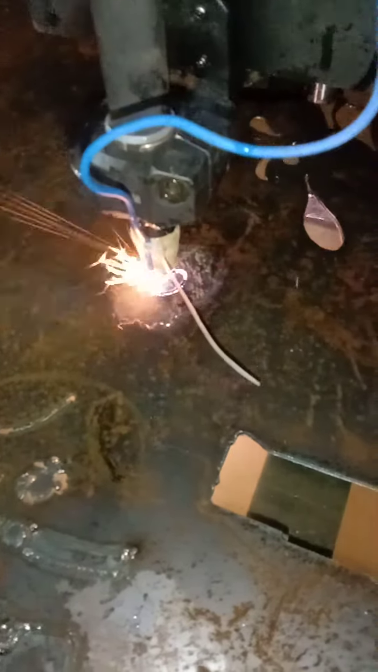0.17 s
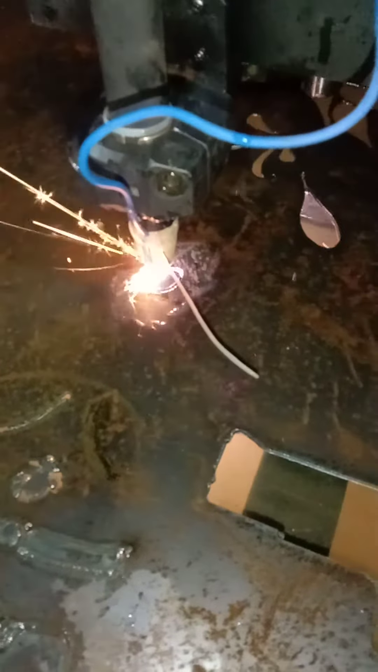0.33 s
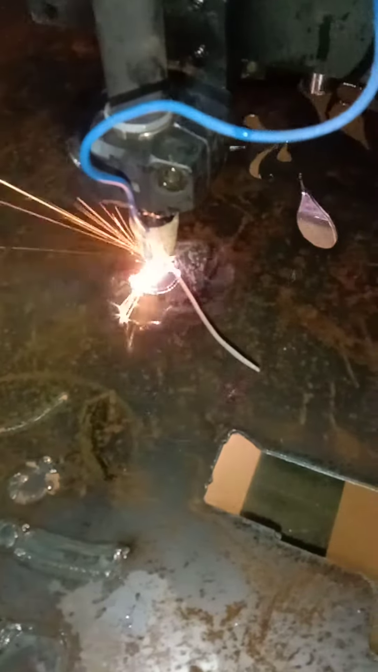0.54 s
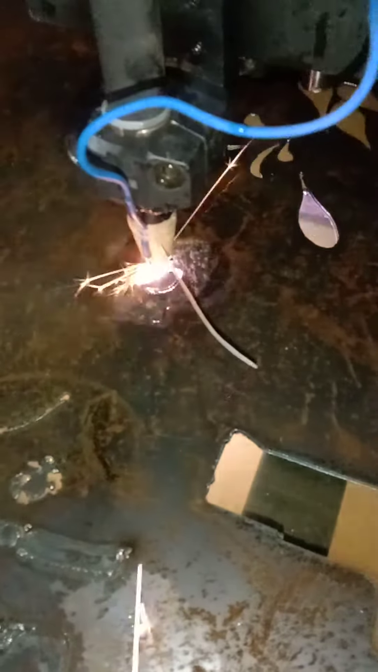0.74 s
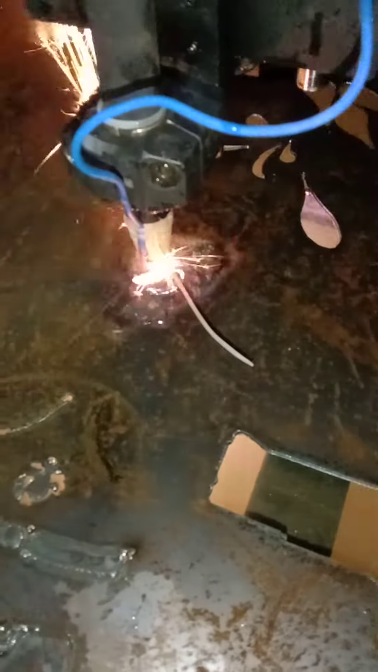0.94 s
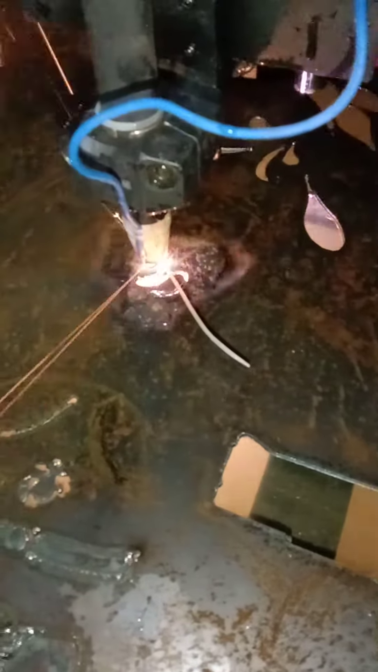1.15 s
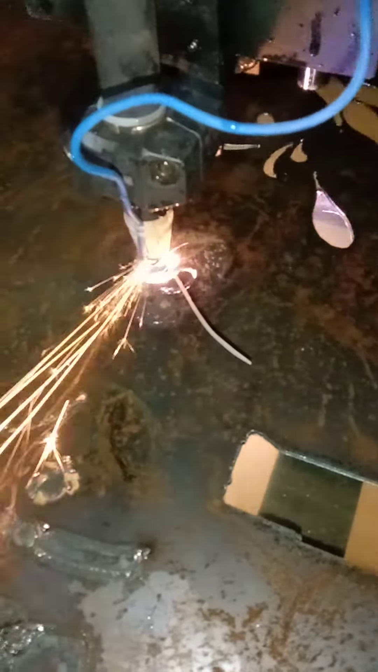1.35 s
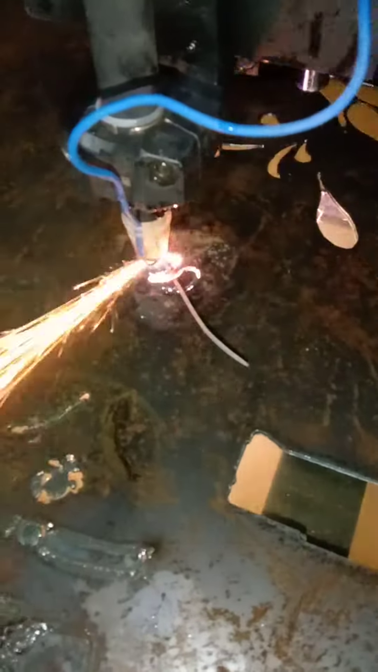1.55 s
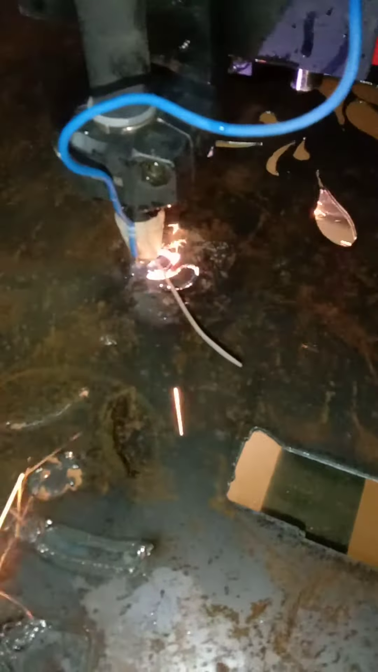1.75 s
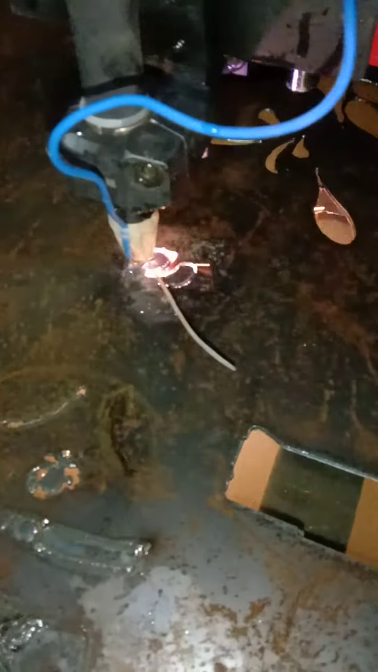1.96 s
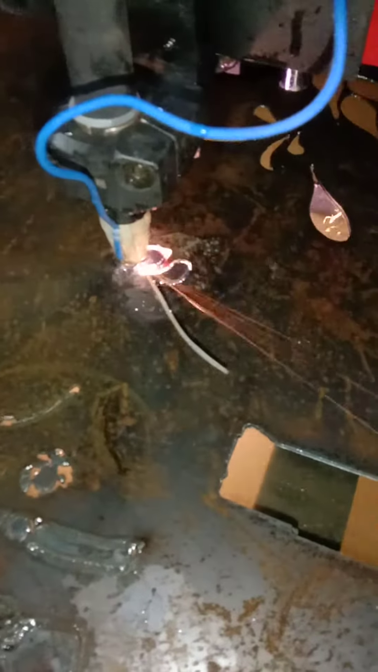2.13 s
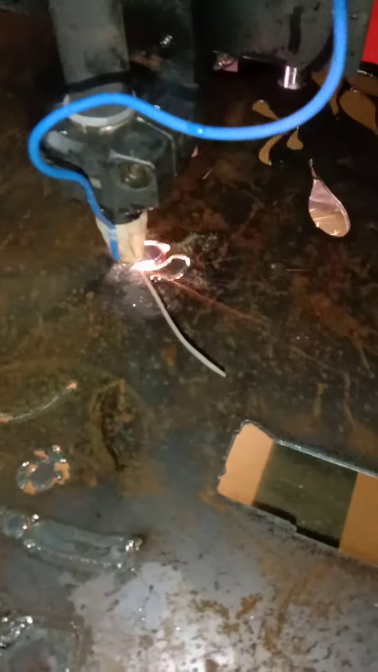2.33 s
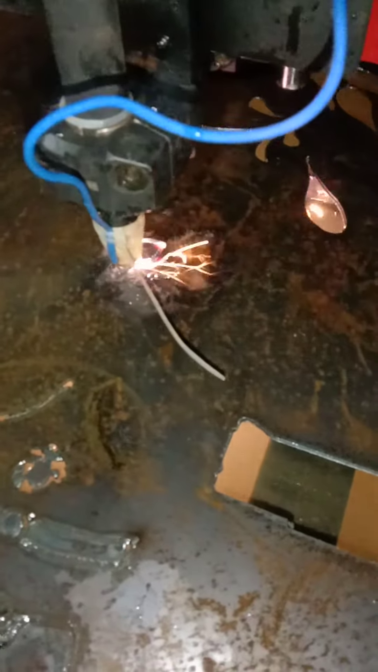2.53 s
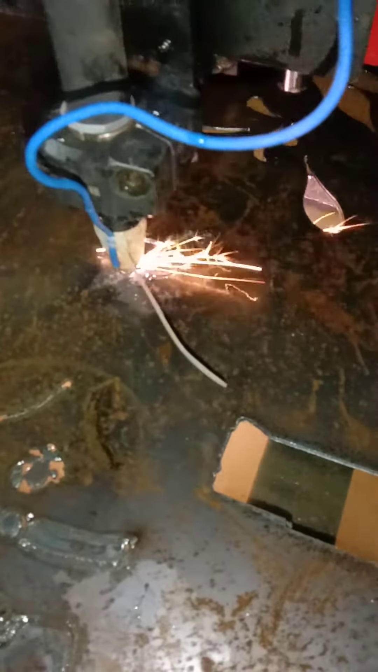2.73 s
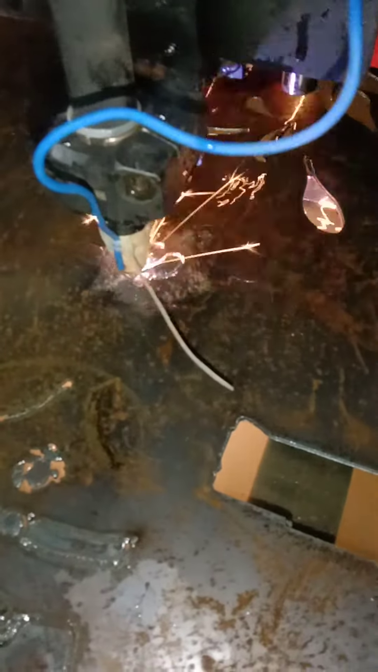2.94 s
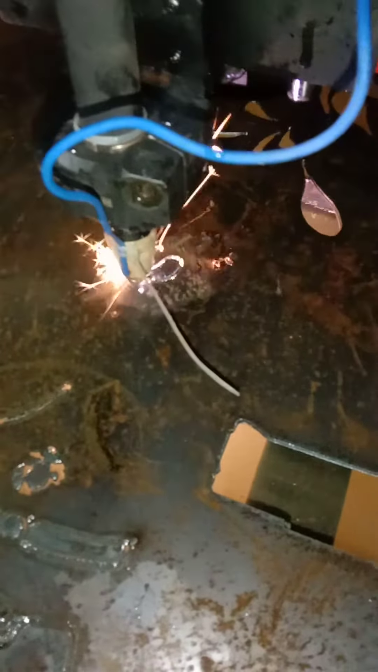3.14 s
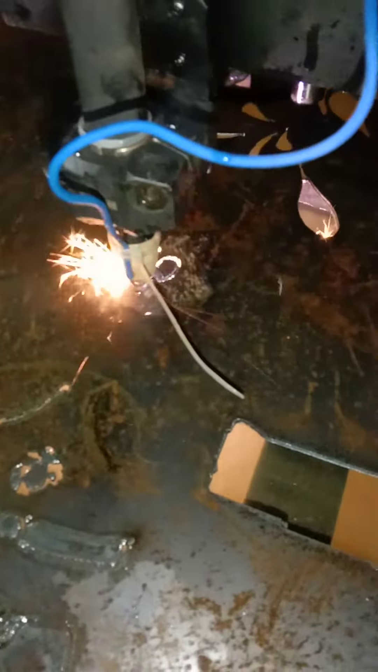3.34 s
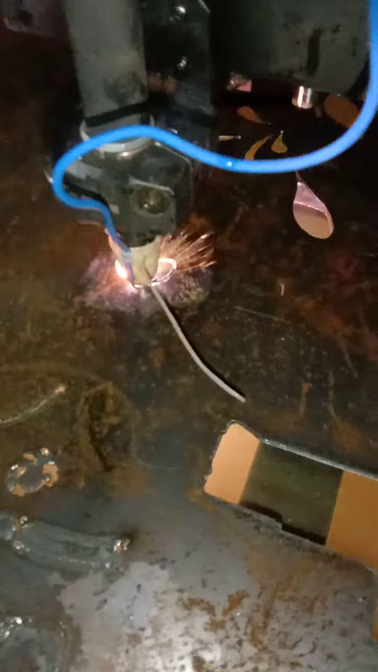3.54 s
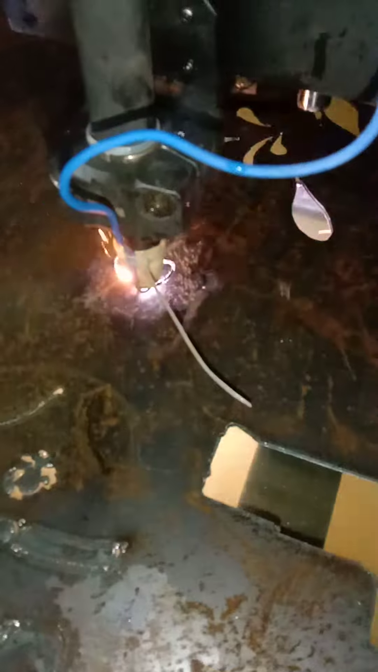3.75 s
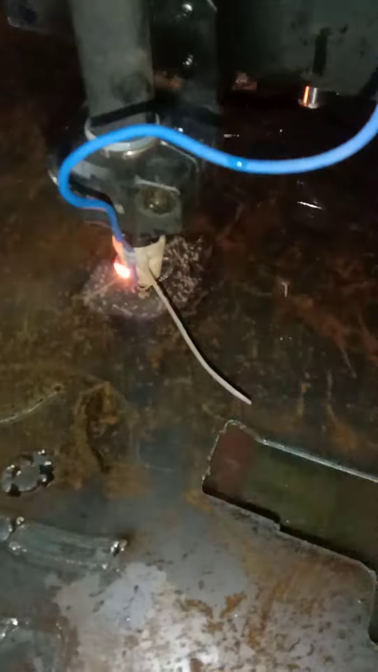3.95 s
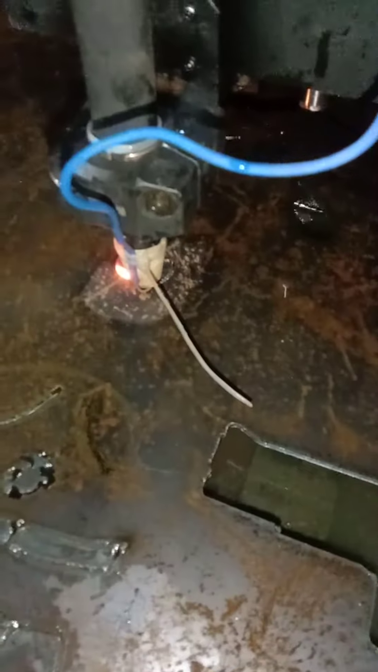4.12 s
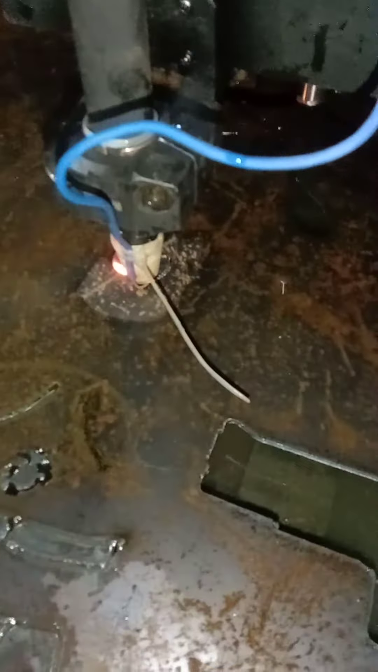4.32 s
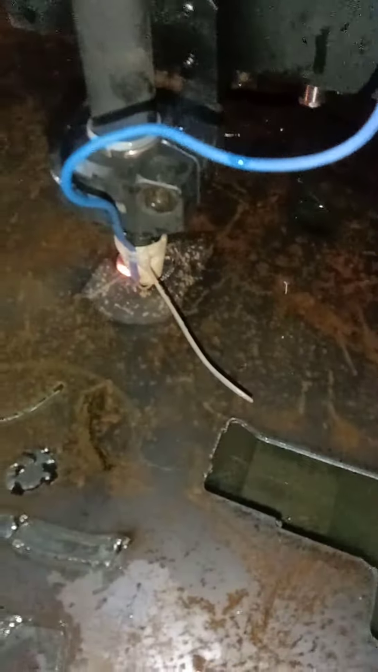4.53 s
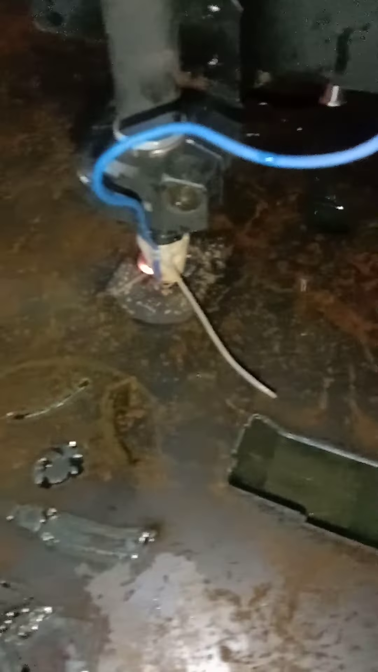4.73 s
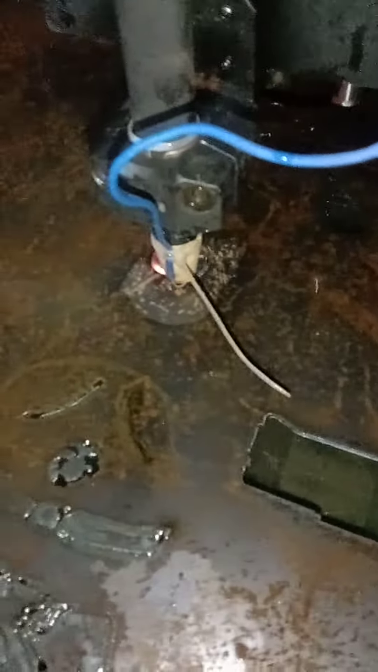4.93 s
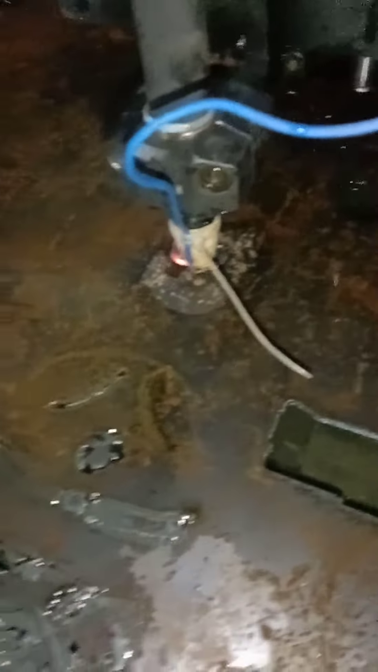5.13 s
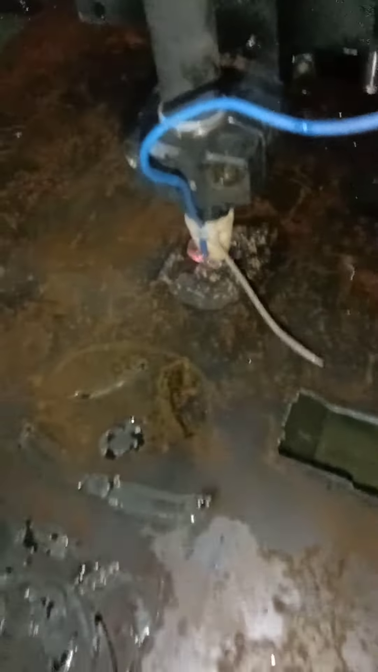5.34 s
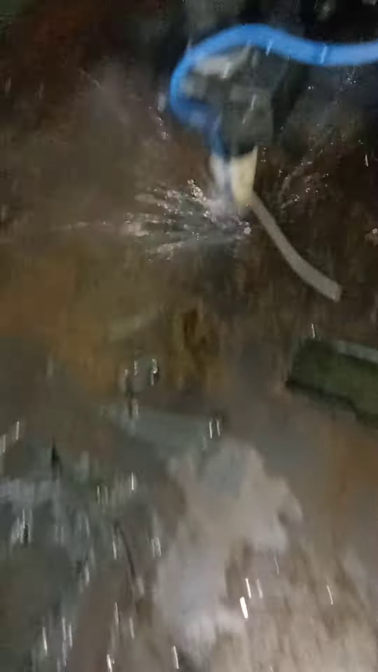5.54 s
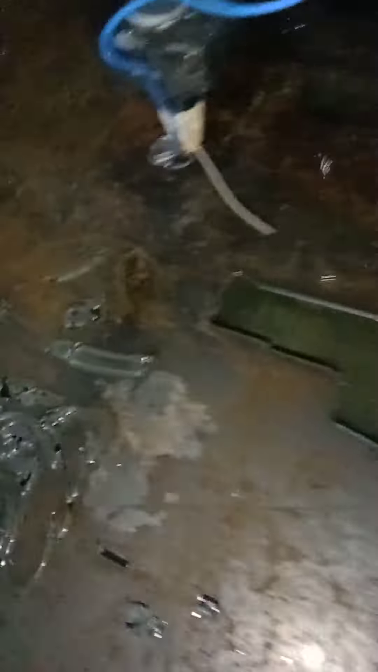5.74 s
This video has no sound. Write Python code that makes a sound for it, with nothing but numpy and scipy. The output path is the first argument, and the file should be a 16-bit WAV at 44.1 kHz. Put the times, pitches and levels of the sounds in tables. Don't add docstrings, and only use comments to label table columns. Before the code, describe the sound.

A plasma torch hisses and whistles fiercely on wet steel, cuts out to thin air hiss, then its jet sweeps loudly across the plate.

```python
import sys
import numpy as np
from scipy import signal
from scipy.fft import rfft, irfft, next_fast_len
from scipy.io import wavfile
from scipy.ndimage import uniform_filter1d, map_coordinates

SR = 44100
rng = np.random.default_rng(int(sys.argv[2]) if len(sys.argv) > 2 else 0)


def boost(x):
    u = np.asarray(x, float) / 20
    return 10 ** u


def store_wav(level_fs):
    pcm = np.round(np.clip(np.atleast_2d(level_fs), -1, 1) * 32767)
    wavfile.write(sys.argv[1], SR, pcm.T.astype(np.int16))


N = 254898
TIME_S = np.arange(N) / SR

# time in seconds, gas flow in dB,
# slot depth in dB by which the slot favours hiss over fizz.
ARC_FLOW = [(0, -23, -1.5), (.22, -22.5, -1), (.77, -21, 1), (.92, -25.5, 7), (1.03, -28, -3.5),
            (1.13, -23, -1.5), (1.29, -25.5, -1.5), (1.6, -25, 3), (1.9, -22.5, -10), (2.3, -24.5, -1.5),
            (2.65, -25, 0.5), (2.85, -24.5, -1), (3.15, -23.5, -0.5), (3.4, -23, 1), (3.63, -22.5, -0.5),
            (3.83, -25.5, -1), (3.89, -21, -1.5), (4.012, -22.5, -4)]
ARC_END_S = ARC_FLOW[-1][0]
# time in seconds, hiss in dB,
# nozzle height in dB by which fizz fades against hiss.
JET_SWEEP = [
    (5.085, -31.5, -2),
    (5.17, -26.5, -3),
    (5.3, -22.5, -2.5),
    (5.46, -20, 0),
    (5.515, -23, 5),
    (5.555, -16, 7),
    (5.595, -24, 8),
    (5.63, -20.5, 5),
    (5.78, -23, 4),
]


def unit(x):
    return x / np.sqrt(np.mean(x ** 2) + 1e-20)


def along(points, hz):
    f, v = np.transpose(points)
    return np.interp(np.log(hz + 1), np.log(f + 1), v, left=-120)


def gate(start_s, end_s):
    ramp_s = .018
    rising = np.clip((TIME_S - start_s) / ramp_s + 1, 0, 1)
    falling = np.clip((end_s - TIME_S) / ramp_s + 1, 0, 1)
    return rising * falling


def curves(rows):
    s, *cols = np.transpose(rows)
    return [gate(s[0], s[-1])] + [np.interp(TIME_S, s, c) for c in cols]


def bumps(rows):
    return sum(boost(db) * np.exp(-((TIME_S - s) / half_s) ** 2) for s, half_s, db in rows)


def swells(notes, idle_db):
    power = boost(2 * idle_db)
    for s, half_s, db, hz in notes:
        power = power + boost(2 * db) * np.exp(-2 * ((TIME_S - s) / half_s) ** 2)
    peak_s, note_hz = np.transpose(notes)[[0, 3]]
    return np.sqrt(power), np.interp(TIME_S, peak_s, note_hz)


def decay(start_s, fade_s):
    return np.exp(-np.clip(TIME_S - start_s, 0, None) / fade_s)


def wobble(rate):
    knots = rng.standard_normal(int(N * rate / SR) + 4)
    return map_coordinates(knots, [np.arange(N) * rate / SR])


def filtered(x, response):
    m = next_fast_len(N + SR // 2)
    return irfft(rfft(x, m) * response(np.fft.rfftfreq(m, 1 / SR)), m)[..., :N]


def turbulence(streak_db, patch_db):
    hz, t, z = signal.stft(rng.standard_normal(N), SR, nperseg=512)

    def blur(rows, cols):
        grain = uniform_filter1d(rng.standard_normal(z.shape), rows, 0)
        return unit(uniform_filter1d(grain, cols, 1))

    weaker_low_down = np.clip(hz / 4000, .3, 1)[:, None]
    streaks = streak_db * weaker_low_down * blur(2, 40)
    patches = patch_db * blur(20, 6)
    return signal.istft(z * boost(streaks + patches), nperseg=512)[1][:N]


def bands(x, colour, edges_hz):
    def above(hz, edge):
        return 1 / (1 + (edge / (hz + 1)) ** 24)

    def part(lo, hi):
        split = lambda hz: np.sqrt(np.abs(above(hz, lo) - above(hz, hi)))
        return unit(filtered(x, lambda hz: boost(along(colour, hz)) * split(hz)))

    return [part(lo, hi) for lo, hi in zip(edges_hz, edges_hz[1:])]


def narrow(hz, width_hz):
    slow = rng.standard_normal((2, N))
    for stage in (1, 2, 2):
        slow = signal.lfilter([1], [1, -np.exp(-stage * np.pi * width_hz / SR)], slow)
    turn = 2 * np.pi * np.cumsum(hz * np.ones(N)) / SR
    return unit(slow[0] * np.cos(turn) + slow[1] * np.sin(turn))


def arc():
    # frequency in Hz, level in dB per Hz.
    arc_colour = [(300, -27), (500, -11), (690, -1), (800, -12.5), (1050, -8), (1350, -10), (2040, -9),
                  (2900, -10), (4200, -12), (5000, 0.5), (7100, 2), (9200, -8.5), (11300, -7), (15400, 0)]
    # centre in Hz, width in Hz, gain in dB.
    plate_modes = [(1202, 20, 8), (1315, 140, 10.5), (1526, 22, 11.5), (1700, 36, 5)]
    on, flow_db, depth_db = curves(ARC_FLOW)
    plate = lambda hz: boost(sum(db / (1 + (2 * (hz - c) / w) ** 2) for c, w, db in plate_modes))
    gas = filtered(turbulence(streak_db=2.2, patch_db=1.3), plate)
    roar, body, hiss, edge, fizz = bands(gas, arc_colour, [1, 2350, 4400, 6000, 8500, 3e4])
    stretch_s, stretch_rise_s, stretch_db = 3.855, .03, 4
    flare_db = stretch_db * np.clip((TIME_S - stretch_s) / stretch_rise_s, 0, 1)
    roar_follows = 0.23
    steady_db = (roar_follows - 1) * (flow_db - np.mean(ARC_FLOW, 0)[1])
    mix = boost(-7.5 + depth_db) * hiss
    mix += boost(-8 + .4 * depth_db + flare_db) * edge
    mix += boost(1.5 - .3 * depth_db) * fizz
    mix += boost(-10.5 - .2 * depth_db + steady_db) * (roar + boost(0.5) * body)
    return on * boost(flow_db + 0.09 * wobble(16)) * mix


def kerf_whistles():
    # peak in seconds, half length in seconds, peak in dB, note in Hz.
    low_notes = [(.2, 0.35, -37.5, 2640), (.9, 0.1, -23, 2667), (1.02, 0.038, -32, 2600),
                 (1.49, 0.081, -32.5, 2710), (1.76, 0.12, -30, 2655), (1.97, .06, -28.5, 2640),
                 (2.2, 0.12, -29, 2730), (2.53, 0.13, -34.5, 2754), (2.76, 0.059, -33.5, 2600),
                 (3.05, .09, -43, 2630), (3.85, .11, -40, 2670)]
    high_notes = [(.3, 0.23, -36, 3310), (.84, 0.13, -27.5, 3260), (1.25, 0.17, -39, 3130),
                  (1.5, 0.18, -30, 3220), (1.97, 0.11, -30.5, 3300), (2.27, 0.18, -42, 3320),
                  (2.54, 0.081, -42, 3350), (2.92, .09, -33.5, 3330), (3.17, 0.24, -31.5, 3380),
                  (3.46, 0.076, -29.5, 3445), (3.98, 0.046, -33, 3290)]
    # peak in seconds, half length in seconds, peak in dB.
    shrill_swells = [
        (.14, .05, -35),
        (3.87, .06, -32),
    ]
    low_gain, low_hz = swells(low_notes, idle_db=-66)
    high_gain, high_hz = swells(high_notes, idle_db=-38)
    low = low_gain * boost(-1.5 + 1.5 * wobble(20)) * narrow(low_hz + 40 * wobble(15), width_hz=200)
    high = high_gain * boost(-2.5 + 1.2 * wobble(20)) * narrow(high_hz + 60 * wobble(8), width_hz=400)
    shrill = bumps(shrill_swells) * narrow(9650, width_hz=600)
    return gate(0, ARC_END_S) * (low + high + shrill)


def jet(hiss_db, mix_db, colour, streak_db, patch_db, flutter_db):
    air = turbulence(streak_db, patch_db)
    roar, splash, hiss, fizz = bands(air, colour, [1, 2600, 4350, 8500, 3e4])
    mix = hiss + sum(boost(db) * layer for db, layer in zip(mix_db, (fizz, splash, roar)))
    return boost(hiss_db + flutter_db * wobble(28)) * mix


def sweeping_jet():
    # frequency in Hz, level in dB per Hz.
    sweep_colour = [(300, -58), (450, -23.5), (700, -10), (1400, -9), (2000, -13.5), (3200, -10.5),
                    (4100, -15.5), (5000, -5.5), (5800, -0.5), (7000, -5), (8500, -12), (11000, -9.5),
                    (13400, -4), (15500, -3.5)]
    on, hiss_db, height_db = curves(JET_SWEEP)
    spit_db = 2 * decay(5.085, fade_s=0.044)
    follows = 0.86
    steady_db = (follows - 1) * (hiss_db - np.median(JET_SWEEP, 0)[1])
    mix_db = [1.1 - height_db,
              -13 + steady_db + spit_db,
              -14.5 + steady_db + .4 * spit_db]
    return on * jet(hiss_db, mix_db, sweep_colour, streak_db=1.6, patch_db=1.05, flutter_db=-0.4)


def lift_rush():
    # time in seconds, level in dB, centre in Hz.
    lift_path = [
        (5.085, -37, 2900),
        (5.105, -31.5, 2400),
        (5.14, -30, 1850),
        (5.18, -35, 1742),
        (5.28, -35.5, 1910),
        (5.36, -37, 1700),
    ]
    # peak in seconds, half length in seconds, peak in dB.
    gulps = [
        (5.28, 0.0099, -45),
        (5.335, 0.011, -36.5),
        (5.541, 0.013, -37.5),
    ]
    lifting, lift_db, lift_hz = curves(lift_path)
    rush = lifting * boost(lift_db) * narrow(lift_hz, width_hz=1200)
    gurgle = bumps(gulps) * narrow(542, width_hz=220)
    return filtered(rush + gurgle, lambda hz: 1 / (1 + (330 / (hz + 1)) ** 6))


def cooling_air():
    # frequency in Hz, level in dB per Hz.
    air_colour = [(260, -61), (450, -28.5), (650, -11.5), (900, -19.5), (1450, -9.5), (1900, -20.5),
                  (2300, -16.5), (4250, -19), (5200, -5.5), (7000, -7.5), (8800, -23), (11500, -19),
                  (13500, -15), (15500, -13.5)]
    start_s, end_s = 4.03, 5.065
    ringdown = decay(start_s, fade_s=0.046)
    mix_db = [4.7 + 1.5 * ringdown, -10 + 6 * ringdown, -11.5 + 14 * ringdown]
    return gate(start_s, end_s) * jet(-33.5, mix_db, air_colour, streak_db=2.0, patch_db=0.16, flutter_db=0.14)


def whine():
    # time in seconds, pitch in Hz, fundamental in dB, octave in dB.
    whine_path = [
        (4.07, 720, -49, -48),
        (4.2, 722, -43.5, -49),
        (4.5, 741, -54, -55),
        (5.04, 730.5, -51, -52),
        (5.13, 727, -40, -43.5),
        (5.43, 733, -41.5, -43.5),
        (5.58, 723, -45, -53),
        (5.7, 733, -41.5, -34),
        (5.78, 723, -48, -34),
    ]
    on, hz, first_db, second_db = curves(whine_path)
    turn = 2 * np.pi * np.cumsum(hz) / SR + 0.075 * wobble(25)
    first = np.sqrt(2) * np.sin(turn) * boost(0.28 * wobble(30))
    second = 1.4 * np.sin(2 * turn) + 0.66 * narrow(2 * hz, width_hz=29)
    return on * (boost(first_db) * first + boost(second_db) * second)


def blows():
    # time in seconds, peak in dB, push (+) or pull (-) factor.
    single_puffs = [(0.0107, -10.5, -0.65), (0.0344, -17, -0.034), (0.0432, -17.5, 0.71),
                    (0.061, -24, -0.68), (0.1268, -15.5, 0.66), (0.349, -19, 0.84), (0.5264, -24, 1),
                    (0.5394, -26.5, -1.7), (0.5685, -19.5, 1), (0.5984, -13.5, -1), (0.6803, -20.5, -1.14),
                    (0.705, -24.5, 1), (2.0953, -26.5, -1), (2.257, -23, -0.86), (2.2975, -19, 0.83),
                    (2.4793, -24, -1), (2.563, -20, 0.92), (2.7983, -18.5, 1), (2.8745, -20, 0.93),
                    (3.0086, -23, 1), (3.341, -31.5, -1.5), (3.539, -22.5, -0.6), (3.9223, -14, 0.95),
                    (3.9252, -15, 0.88), (3.9384, -24, -1), (3.956, -7.5, -0.35), (3.985, -17, -0.93),
                    (3.993, -11.5, 0.74), (4.011, -25, -1), (4.0137, -20, 0.81)]
    # start in seconds, length in seconds, mean level
    # in dB.
    flutters = [(.027, .004, -17), (0.051, .02, -30), (.1, .025, -30), (0.166, .004, -28.5),
                (0.277, .004, -37), (0.496, .004, -27), (.516, .032, -23.5), (.578, .004, -24.5),
                (.637, .015, -31), (0.826, .004, -34.5), (1.173, .004, -36), (1.776, .004, -30),
                (2.031, .004, -38), (2.144, .004, -30), (2.234, .004, -32), (2.455, .015, -26.5),
                (2.586, .004, -27), (2.615, .004, -30), (2.668, .004, -36), (2.765, .016, -33),
                (2.941, .004, -32), (2.995, .004, -31), (3.014, .045, -27), (3.082, .015, -26),
                (3.194, .004, -33), (3.412, .015, -24), (3.526, .004, -28), (3.933, .016, -24)]
    gap_s, scatter_db = .012, 1.2
    out = np.zeros(N)
    for s, db, sign in single_puffs:
        out[round(s * SR)] += sign * boost(db)
    for s, length_s, db in flutters:
        gap, size, sign = rng.random((8, 3)).T
        at_s = s + gap_s * (np.cumsum(2 * gap) - 2 * gap[0])
        level = boost(db + scatter_db * (4 * size - 2))
        out[np.round(at_s * SR).astype(int)] += (at_s < s + length_s) * np.sign(sign - .35) * level
    return out


def puffs(impulses):
    t = np.arange(SR // 50) / SR
    step = 0.9 * np.exp(-t / 0.00013) + 0.91 * np.exp(-t / 0.0068)
    cut = lambda hz: (1j * hz) ** 3 / ((110 ** 2 - hz ** 2 + 1j * hz * 130) * (70 + 1j * hz))
    soft = lambda hz: 1 / (1 + 1j * hz / 2400) ** 2
    pressure = signal.fftconvolve(impulses, step)[:N]
    return boost(3.5) * filtered(pressure, lambda hz: cut(hz) * soft(hz))


def rumble(pops):
    # frequency in Hz, level in dB per Hz.
    rumble_colour = [(12, -63), (20, -42), (38, -43), (145, -17.5), (177, -0.5), (206, -9.5), (362, -7.5),
                     (500, -11.5), (650, 3.5), (1100, -120)]

    def eddies(trail_s):
        return np.abs(filtered(pops ** 2, lambda hz: 1 / (1 + 2j * np.pi * hz * trail_s) ** 2))

    def burning(settle_s):
        return decay(ARC_END_S, settle_s / 2)

    stir, linger = eddies(.008), eddies(.05)
    gust = np.exp(-2 * ((TIME_S - 5.575) / .09) ** 2)
    on, hiss_db, height_db = curves(JET_SWEEP)
    power = boost(2 * -68) + boost(2 * -51.5) * burning(0.14)
    power += boost(2 * -13.5) * stir + boost(2 * -46) * gust
    power += on * boost(2 * (hiss_db - 34))
    deep_power = boost(2 * -93) + boost(2 * -72) * burning(.03)
    deep_power += boost(2 * -18) * stir + boost(2 * -16) * linger + boost(2 * -61) * gust
    hum = narrow(240, width_hz=67)
    hum_level = boost(-70) + on * boost(hiss_db - 37)
    deep, low = bands(rng.standard_normal(N), rumble_colour, [1, 120, 3e4])
    upper = np.sqrt(power) * boost(3.4 * wobble(21.85)) * (low + 0.32 * hum)
    return upper + hum_level * hum + np.sqrt(deep_power) * boost(5.1 * wobble(18)) * deep


def reflected(x):
    # (delay in ms, gain).
    echo_sets = [
        (0, [(0.596, 0.08), (0.836, 0.1), (1.146, 0.06), (1.492, -0.06), (1.954, -0.06), (2.11, -0.08), (2.392, -0.07), (3.244, -0.05), (3.504, 0.05)]),
        (.85, [(0.588, 0.07), (0.642, 0.05), (0.754, 0.04), (0.91, -0.05), (1.134, 0.06), (1.234, 0.04), (1.688, -0.04), (1.804, 0.07), (2.212, 0.05)]),
        (4.02, [(0.59, 0.06), (0.696, -0.1), (1.318, 0.08), (1.466, -0.07), (1.782, 0.06), (1.9, -0.08), (2.2, 0.08), (2.426, -0.09), (2.606, 0.05)]),
        (5.15, [(0.582, 0.07), (0.66, 0.06), (0.874, 0.05), (0.924, 0.08), (0.966, -0.05), (1.35, 0.05), (1.754, 0.04), (2.168, 0.05), (4.508, -0.04)]),
    ]
    fade_s = 0.29
    begun = [np.clip((TIME_S - s) / fade_s + .5, 0, 1) if s else 1 for s, taps in echo_sets] + [0]

    def comb(taps):
        return lambda hz: 1 + 1.2 * sum(g * np.exp(-2j * np.pi * hz * ms / 1000) for ms, g in taps)

    return sum((now - later) * filtered(x, comb(taps))
               for (s, taps), now, later in zip(echo_sets, begun, begun[1:]))


def scene():
    pops = puffs(blows())
    near_metal = arc() + kerf_whistles() + cooling_air() + sweeping_jet() + lift_rush()
    return np.tile(reflected(near_metal) + whine() + rumble(pops) + pops, (2, 1))


def side_flecks(mid):
    fleck_edges_hz = [4130, 5250, 6370, 6980, 8300, 9700, 11050, 12400, 13800, 15250]
    chance = .024
    side, n = np.zeros(N), np.arange(2048)
    window = np.sin(np.pi * (n + .5) / 2048)
    chosen = np.argwhere(rng.random((N // 1024 - 2, len(fleck_edges_hz) - 1)) < chance)
    for count, band in chosen:
        centre = 964 + 1024 * (count + 1)
        frame = slice(centre - 1024, centre + 1024)
        lo, hi = fleck_edges_hz[band:band + 2]
        bins = np.arange(round(lo * 2048 / SR) + 2, round(hi * 2048 / SR) - 2)
        basis = window * np.cos(np.pi / 1024 * np.outer(bins + .5, n + 512.5)) / np.sqrt(512)
        level = np.sqrt(np.mean((basis @ mid[frame]) ** 2))
        side[frame] += boost(-3.5) * level * rng.standard_normal(len(bins)) @ basis
    return side


def band_limit(x):
    return signal.sosfilt(signal.butter(12, 16870, fs=SR, output="sos"), x)


def record(dry):
    top_hz = 15500
    mid = filtered(dry[0], lambda hz: 1 / (1 + (hz / top_hz) ** 900))
    side = side_flecks(mid)
    return band_limit(np.array([mid + side, mid - side]))


dry = scene()
out = record(dry)
store_wav(out)
```